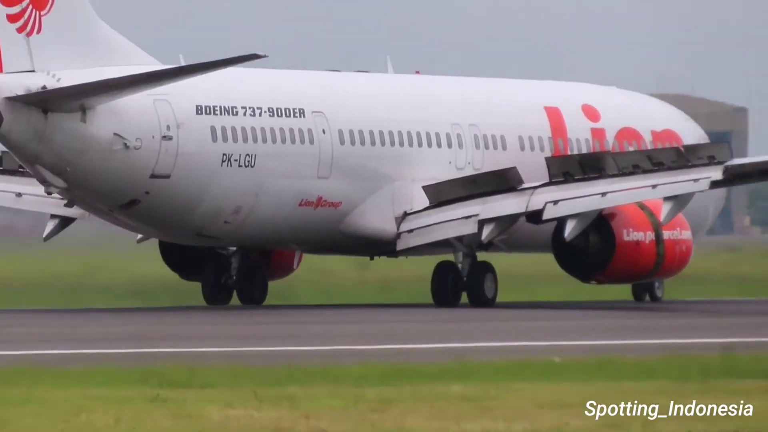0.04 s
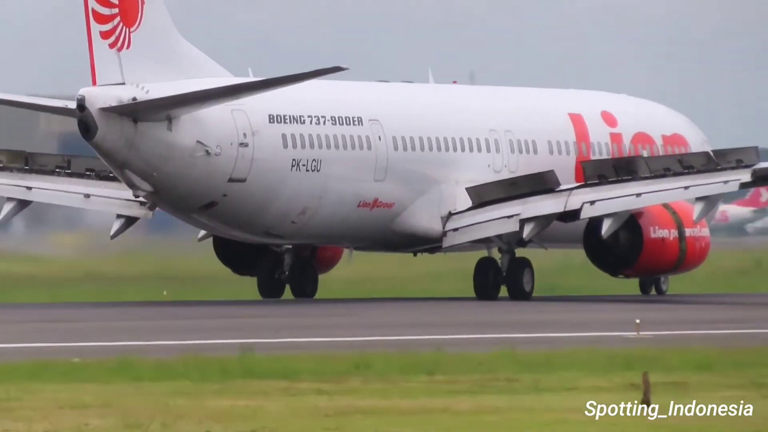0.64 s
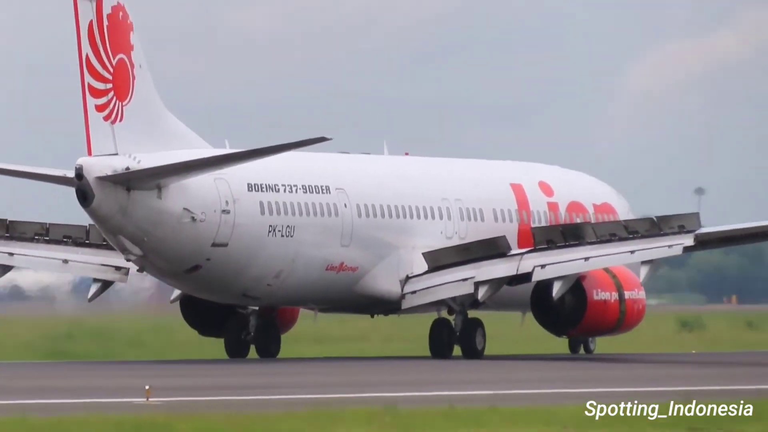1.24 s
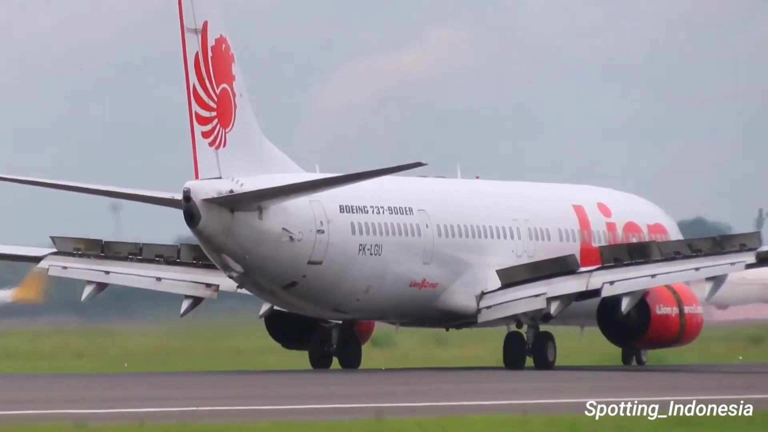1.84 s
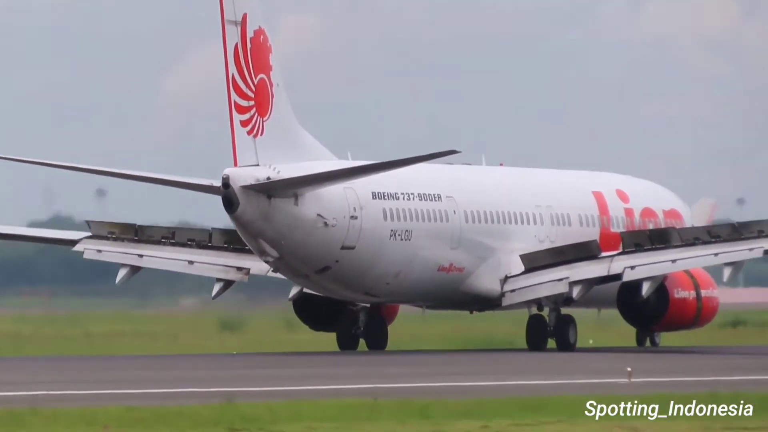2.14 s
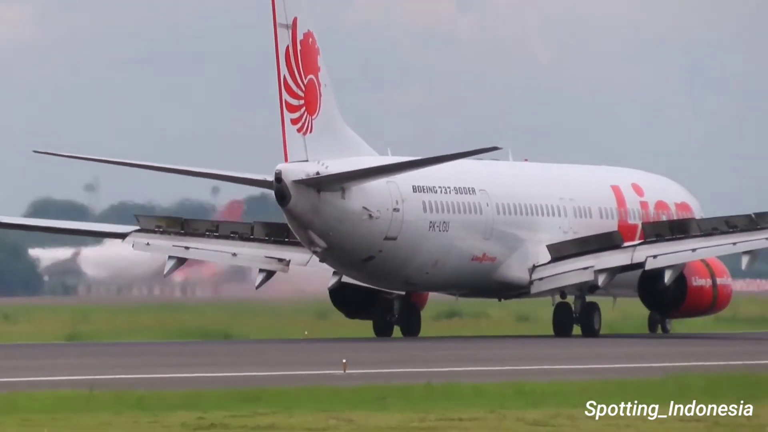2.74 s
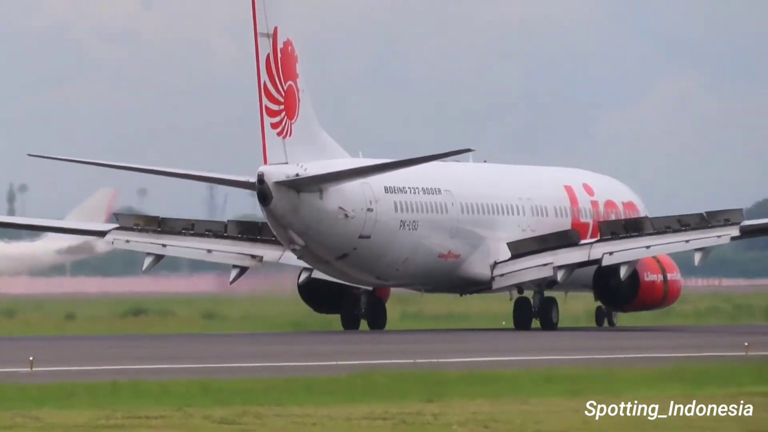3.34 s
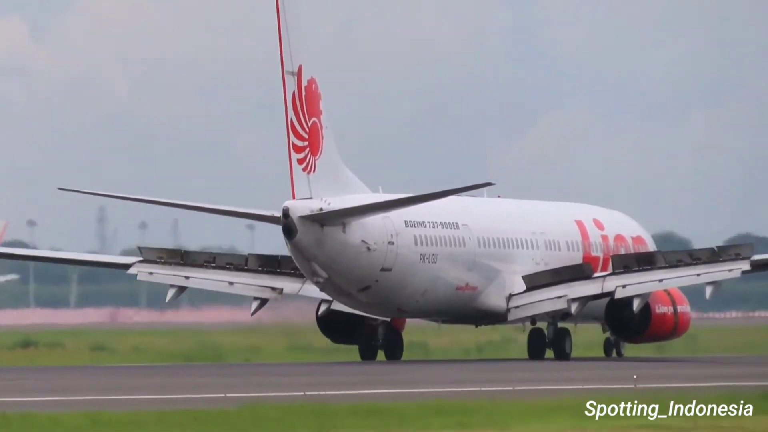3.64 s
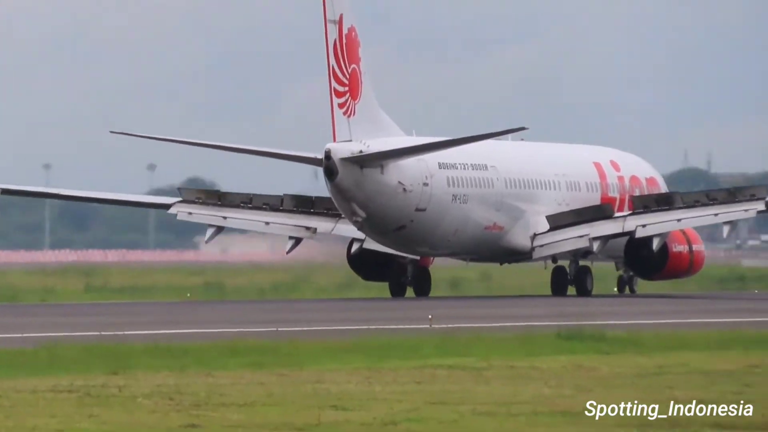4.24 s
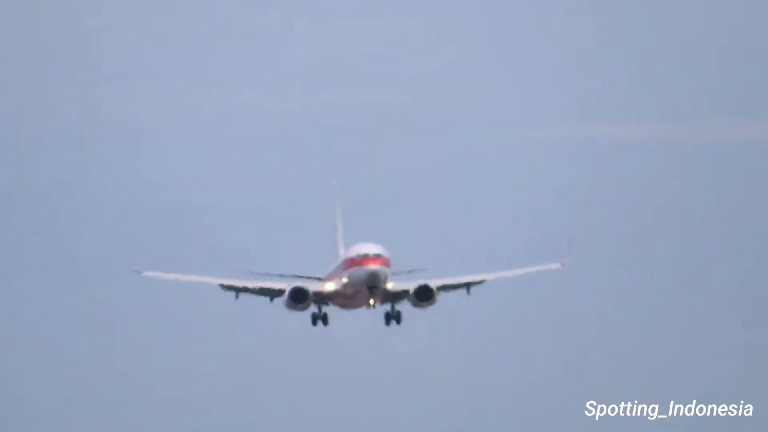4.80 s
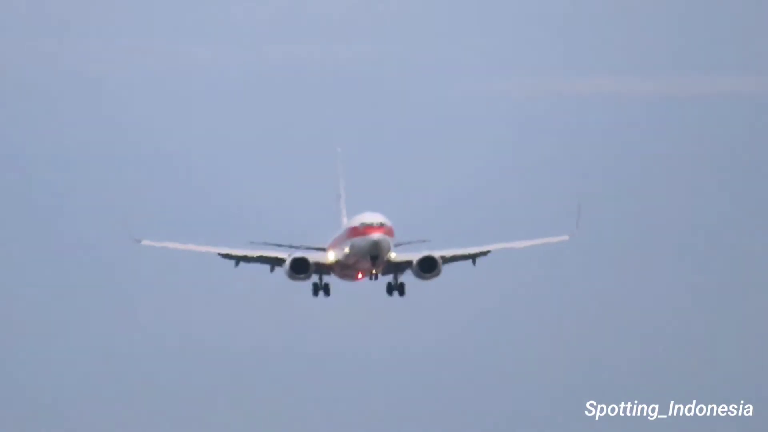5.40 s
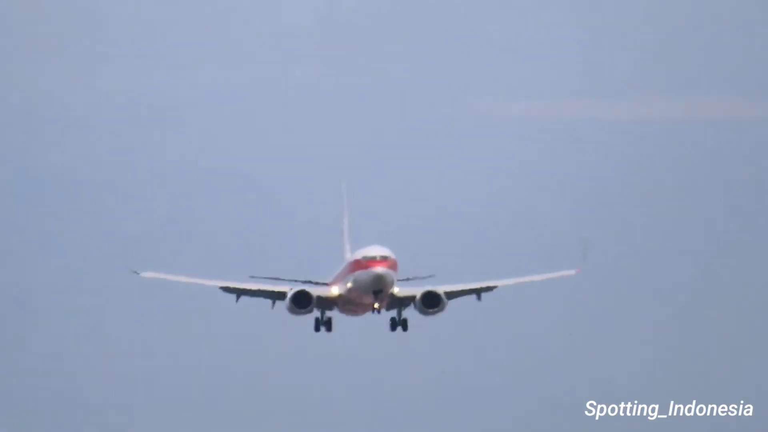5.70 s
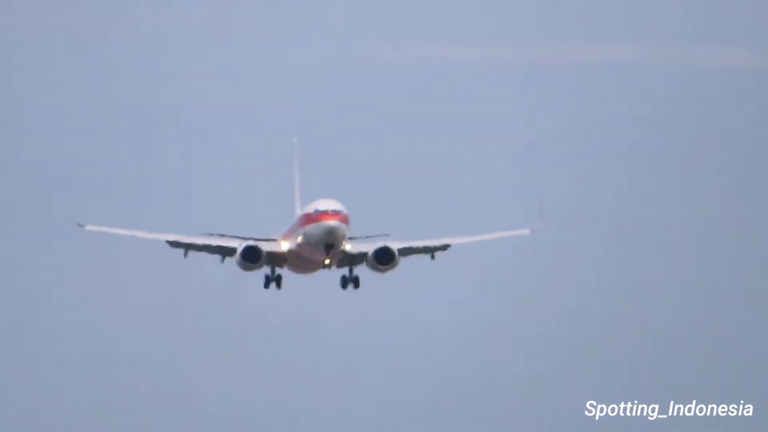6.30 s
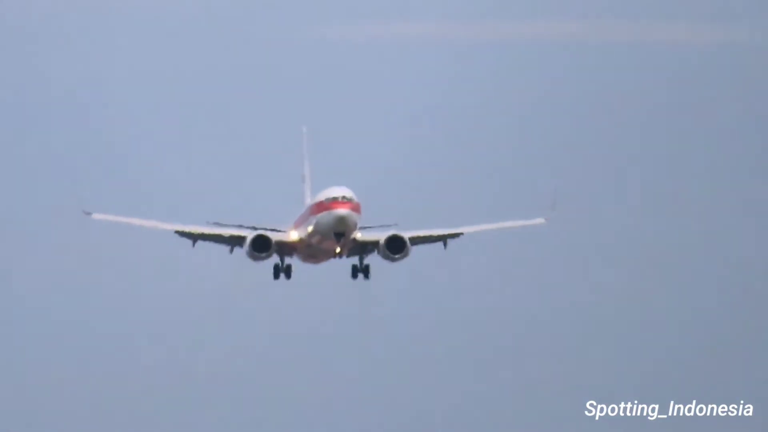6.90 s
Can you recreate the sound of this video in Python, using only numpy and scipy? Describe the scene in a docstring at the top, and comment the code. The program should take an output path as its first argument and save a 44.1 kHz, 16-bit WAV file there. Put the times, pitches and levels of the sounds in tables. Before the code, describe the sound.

A bass-heavy jet roar flutters in the air as an airliner slows on a runway some way off, its whine sinking into the rumble. After a very short silent break, another airliner is heard coming in, with low throbbing tones, sagging whines and hollow howls; it eases briefly, then gets louder. An airy breeze hiss builds near the microphone, with a few soft gusts.

```python
"""A jet roar over a wavering rumble: beside a runway an airliner rolls out, and after a short silent cut
a second one approaches. Exhaust eddies make each jet's rumble, roar and tearing edge, which flutter in
the turbulent air and are rippled by echoes. Whining bands in the roar sag and fade, hollow howls and low
booms swell, and a drone throbs under the second jet. Close by, a breeze hisses and buffets."""
import sys
import numpy as np
from scipy import signal
from scipy.fft import rfft, irfft
from scipy.io import wavfile
from scipy.ndimage import uniform_filter1d

SR = 44100
rng = np.random.default_rng(int(sys.argv[2]) if len(sys.argv) > 2 else 0)


def unload_audio(sound):
    """Save the sound as a 16-bit wav file, at the path given as the first command line argument."""
    columns = np.transpose(np.atleast_2d(sound))
    # keep every value between -1 and 1, then stretch to whole-number steps
    steps = np.round(np.clip(columns, -1, 1) * 32767)
    wavfile.write(sys.argv[1], SR, steps.astype(np.int16))


N = 315315
TIME = np.arange(N) / SR
FREQ = np.maximum(np.arange(N // 2 + 1) * SR / N, 1)
CUT_START_S, CUT_END_S = 4.737, 4.891


def undb(db):
    """Decibels to gain."""
    return 10 ** (np.asarray(db) / 20)


def curve(points):
    """A fader ride through (time [s], level [dB]) points, in dB at every sample."""
    return np.interp(TIME, *np.transpose(points))


def swells(table):
    """Summed gain of bell-shaped swells from (time [s], half length [s], level [dB]) rows."""
    return sum(undb(db) * np.exp(-((TIME - s) / half_s) ** 2) for s, half_s, db in table)


def colour(points):
    """An EQ curve through (frequency [Hz], level [dB]) points, as gain at every frequency."""
    hz, db = np.transpose(points)
    return undb(np.interp(np.log(FREQ), np.log(hz), db))


def unit(x):
    """Scale to rms 1."""
    return x / np.sqrt(np.mean(x ** 2))


def walk(rate):
    """A wobble that slides to a new random value every 1 / rate seconds; spread near 1."""
    steps = rng.standard_normal(2048)
    return 1.22 * np.interp(TIME * rate, np.arange(len(steps)), steps)


def noise(gain):
    """Noise of rms 1, shaped by a gain at every frequency."""
    return unit(irfft(rfft(rng.standard_normal(N)) * gain, N))


def narrow(hz, width_hz):
    """A narrow band of noise around a pitch that may glide."""
    slow_hz = FREQ[:N // 16]
    spectrum = rng.standard_normal(2 * len(slow_hz)).view(complex) / (1 + (2 * slow_hz / width_hz) ** 2)
    carrier = np.cos(2 * np.pi * np.cumsum(hz * np.ones(N)) / SR)
    return np.sqrt(2) * unit(irfft(spectrum, N)) * carrier


def stereo(mid, side):
    """Left and right from mid and side."""
    return np.array([mid + side, mid - side])


def part_levels(parts, swell, start_s):
    """Level in dB of each part of a jet: a steady drift plus its share of the common swell."""
    return [db + drift * (TIME - start_s) + share * curve(swell) for db, drift, share in parts]


def exhaust(spectrum, levels_db, surge_db, flutter_db, flutter_rate, patchy_db, rasp_db):
    """Jet mixing noise: big eddies rumble, middling ones roar, small ones at the nozzle tear and sizzle."""
    limits_hz = [18, 280, 1400, 3200, 12000]
    shape, out = colour(spectrum), 0
    # moving air focuses and scatters the sound; steep wave fronts come in quick, rasping bunches
    flutter = flutter_db * walk(flutter_rate) + rasp_db * walk(140)
    wobbles_db = [surge_db * walk(24), flutter, flutter, flutter]
    for lo, hi, db, wobble_db in zip(limits_hz, limits_hz[1:], levels_db, wobbles_db):
        eddies = rfft(rng.standard_normal(N)) * shape
        edges = np.geomspace(lo, hi, 4)
        # each band also fades by itself along its own paths
        bands = sum(irfft(eddies * (FREQ >= a) * (FREQ < b), N) * undb(patchy_db * walk(13))
                    for a, b in zip(edges, edges[1:]))
        out = out + unit(bands * undb(wobble_db)) * undb(db)
    return out


def reflect(x, share, drift=0.0002007, count=12):
    """Weak echoes off the ground and things nearby, their delays shifting as the source moves."""
    treble = irfft(rfft(x) * FREQ / np.hypot(FREQ, 600), N)  # small things return only short waves
    delays_s = [0.001511 + .035 * late + drift * (2 * speed - 1) * TIME
                for late, speed in rng.random((count, 2))]
    echoes = sum(np.interp(TIME - delay, TIME, treble) for delay in delays_s) / np.sqrt(count)
    return (x + share * echoes) / np.sqrt(1 + share ** 2)


def ripple(x, table):
    """Standing peaks and hollows that near echoes press into the roar."""
    gain_db = sum(db * .5 ** ((2 * (FREQ - hz) / width_hz) ** 2) for hz, width_hz, db in table)
    return irfft(rfft(x) * undb(gain_db), N)


def whines(table, start_s, sag_per_s, fade_db_per_s, wander=.012, flutter_db=0.8):
    """Whining bands that waver and sag in pitch together, flutter and sink into the roar."""
    age = np.maximum(TIME - start_s, 0)
    pitch = 1 - sag_per_s * age + wander * walk(5)
    bands = sum(undb(db + flutter_db * walk(7)) * narrow(hz * pitch, width_hz)
                for hz, width_hz, db in table)
    return bands * undb(-fade_db_per_s * age)


# bass-heavy tone of the first jet: (frequency [Hz], relative level [dB])
ROLLOUT_COLOUR = [(15, -39.5), (32, -8), (80, 2.5), (115, -2), (165, -1.5), (215, -6.5), (290, -16),
                  (650, -16), (1000, -17.5), (1800, -19), (3000, -28), (5000, -40.5), (7500, -57.5),
                  (9500, -65.5), (12000, -74)]
# its rumble, roar, tearing edge and sizzle: (base level [dB], drift [dB/s], share of the swell [ratio])
ROLLOUT_PARTS = [(-21, 0.3, 0.034), (-27.5, 0.03, 0.45), (-30.5, -0.52, 0.71), (-40, -0.4, 0.34)]
# the air carries it better or worse: (time [s], swell [dB])
ROLLOUT_SWELL = [(.3, 0.5), (.52, 5.5), (1.15, 2.5), (1.5, -0.5), (2.1, 1.9), (3.2, 2.1), (3.75, -0.7),
                 (4.7, 1.5)]
# the low rumble wavers unevenly, with one brief dip midway: (time [s], boost [dB])
RUMBLE_WAVER = [(0, 1.5), (.3, -0.2), (.75, -1), (1.45, 0.8), (2.1, 0), (2.45, -4), (2.9, 0.2), (3.35, 0.5),
                (3.55, 1.3), (3.98, -.5), (4.1, 2.5), (4.7, -1)]
# small lifts in the sizzle: (time [s], boost [dB])
SIZZLE_LIFT = [(0, 0.5), (.55, 1.2), (.9, 0), (1.4, 0), (2.0, 0.8), (3.1, 0), (4.7, 0.5)]
# bright, whining bands in the roar that slowly fade: (start pitch [Hz], width [Hz], start level [dB])
ROLLOUT_WHINES = [(2330, 260, -37.5), (2927, 500, -37), (4730, 1600, -48.5), (7020, 1600, -58.5)]
# near echoes lift some bands and thin others: (centre [Hz], width [Hz], boost [dB])
ROLLOUT_RIPPLE = [(674, 120, 0), (890, 45, 1.5), (966, 90, -2.5), (1457, 100, -1.5), (1563, 100, 1),
                  (2160, 110, -0.5), (2300, 110, 0.5), (2630, 160, -2), (2860, 130, 1), (3330, 140, -2),
                  (3420, 150, 1), (3620, 110, 0.5), (3840, 110, -1.5), (3970, 90, 2.5), (4070, 220, -2),
                  (4620, 250, 0.5), (5110, 280, -2.2), (5530, 250, 1.5), (6400, 400, 0), (6750, 350, 0.5)]


def rollout(hollow):
    """The first jet slows down: the rumble wavers, whining bands in the roar fade and the edge dulls."""
    rumble_db, roar_db, edge_db, sizzle_db = part_levels(ROLLOUT_PARTS, ROLLOUT_SWELL, start_s=0)
    levels_db = [rumble_db + curve(RUMBLE_WAVER), roar_db, edge_db, sizzle_db + curve(SIZZLE_LIFT)]
    roar = exhaust(ROLLOUT_COLOUR, levels_db, surge_db=0.7, flutter_db=0.54, flutter_rate=20,
                   patchy_db=0.18, rasp_db=0.66)
    low_throbs = throbs()
    whine = whines(ROLLOUT_WHINES, start_s=0, sag_per_s=.012, fade_db_per_s=4.5)
    throbs_and_tones = low_throbs + whine * undb(curve(ROLLOUT_SWELL)) + turbine_whistle()
    return ripple(reflect(roar, share=0.32) + throbs_and_tones + hollow, ROLLOUT_RIPPLE)


# brief low throbs in the rumble: (time [s], half length [s], level [dB])
THROBS = [(.02, 0.041, -22), (1.65, .06, -27.5), (2.13, .09, -25), (2.71, 0.045, -19)]


def throbs():
    """A narrow bass band pushes briefly out of the rumble."""
    return narrow(hz=81.4, width_hz=16) * swells(THROBS)


# howls at their crests: (time [s], length [s], pitch [Hz], glide [Hz/s], width [Hz], level [dB])
HOWLS = [(0.18, .4, 390, -29, 45, -31), (1.1, 1., 205, 0, 34, -33), (.9, 1., 1710, -150, 380, -37.5),
         (0.46, .4, 2940, -300, 420, -40), (2.75, 1.6, 2290, -40.5, 170, -45), (2.5, 1.1, 425, 25, 70, -34),
         (2.77, 2.2, 250, 0, 80, -32.5), (2.25, 3.2, 620, 0.5, 51, -38),
         (2.105, 1.4, 2950, -59.5, 180, -47), (2.85, 2., 3496, -130, 220, -47.5),
         (3.3, 2., 1900, -70.5, 520, -38), (3.598, 2.2, 4600, -170, 330, -61), (4.2, 0.61, 112, 0, 45, -26),
         (3.995, 0.93, 317.2, 36, 38, -35), (4.55, 0.64, 850, 0, 200, -33.5),
         (4.795, 0.7, 1110, 81, 250, -31.5), (4.92, 0.33, 1300, -1.5, 660, -31),
         (5.0, 0.5, 506, 0.5, 60, -29), (5.12, .6, 1655, -200, 110, -34.5), (5.3, .5, 2700, -100, 350, -38),
         (5.3, 0.99, 238, 0, 58, -21), (5.39, 0.78, 2680, 2, 1300, -36), (5.95, 1.3, 1428, -40, 90, -40.5),
         (6.1, .45, 757, 57, 90, -27.5), (6.38, .8, 338.5, -75, 85, -23.5), (6.24, 0.7, 950, -40, 100, -33),
         (6.41, .45, 630.5, -29.5, 110, -25.5), (6.544, .6, 1815, -650, 200, -31),
         (6.87, .45, 424.8, -12.5, 85, -25.5), (7.05, .6, 2180, -50.5, 150, -31.5),
         (7.01, 0.87, 2515, -45.5, 200, -34.5), (7.127, .45, 1128, -50, 220, -27.5)]


def howls():
    """Hollow bands that rise out of the roar and sink back as the jets move."""
    out = 0
    for crest_s, length_s, hz, glide, width_hz, db in HOWLS:
        offset_s = np.clip(TIME - crest_s, -length_s / 2, length_s / 2)
        arch = np.cos(np.pi * offset_s / length_s)
        out = out + undb(db) * arch * narrow(hz + glide * offset_s, width_hz)
    return out


# slow bass builds: (centre [Hz], width [Hz], end time [s], end level [dB], rise [dB/s])
BOOMS = [(149.4, 80, 4.8, -15, 16), (101.6, 33, 14, -27, 1), (52.5, 21, 7.6, -21.5, 6.5)]


def booms():
    """Deep, narrow swells: one builds late in the rollout, the others as the second jet nears."""
    return sum(narrow(hz, width_hz) * undb(db - rise * np.abs(end_s - TIME)) * (TIME < end_s)
               for hz, width_hz, end_s, db, rise in BOOMS)


def flicker(x, depth_db, rate):
    """Each stretch of the treble flickers by itself."""
    edges_hz = [0, 4500, 6500, 9000, 12000, SR]
    spectrum = rfft(x)
    return sum(irfft(spectrum * (FREQ >= a) * (FREQ < b), N) * undb(depth_db * walk(rate))
               for a, b in zip(edges_hz, edges_hz[1:]))


# bright, airy tone of the hiss: (frequency [Hz], relative level [dB])
HISS_COLOUR = [(800, -25.5), (3000, 2.5), (5500, 13), (7500, 7.5), (9500, 3.5), (12500, 1.5), (15500, -4)]
# the hiss creeps up, eases and rises again: (time [s], level [dB])
HISS_LEVEL = [(0, -58), (1.6, -57.5), (2.05, -53.5), (3.56, -52), (3.62, -49.5), (4.7, -43.5), (4.9, -47),
              (5.2, -49), (5.85, -49.5), (6.5, -39), (7.15, -37.5)]
# short rustles on top: (time [s], half length [s], level [dB])
RUSTLES = [(3.0, 0.016, -46), (3.64, 0.038, -55), (4.1, 0.056, -56)]
# stereo spread of the hiss: (frequency [Hz], side minus mid [dB])
HISS_WIDTH = [(3000, -4), (6000, -10), (9000, -4.5), (12000, 1)]


def breeze_hiss():
    """The breeze close by: a wide, flickering hiss with short rustles."""
    gain = undb(curve(HISS_LEVEL) + .5 * walk(29)) + swells(RUSTLES)
    mid, side = (reflect(noise(colour(HISS_COLOUR)), share=0.35) for _ in range(2))
    side = irfft(rfft(side) * colour(HISS_WIDTH), N)
    return gain * flicker(stereo(mid, side), depth_db=1.4, rate=16)


# the whistle peeks through late in the rollout: (time [s], level [dB])
WHISTLE_LEVEL = [(3.6, -82), (3.9, -61), (4.1, -55), (4.25, -71), (4.7, -65)]


def turbine_whistle():
    """A faint, thin whistle from the first jet's turbine."""
    return narrow(hz=6560, width_hz=70) * undb(curve(WHISTLE_LEVEL))


# dull tone of wind on the microphone: (frequency [Hz], relative level [dB])
BUFFET_COLOUR = [(20, 2), (55, -6), (130, 12), (300, -4), (450, -11), (700, -46), (2000, -63)]
# gusts: (time [s], half length [s], level [dB])
GUSTS = [(4.6, .5, -55), (5.15, 0.11, -39), (5.7, 0.96, -45.5), (6.55, 0.12, -35), (6.92, 0.16, -40)]


def wind_buffet(steady_db=-79):
    """Gusts over a light breeze buffet the microphone, pushing its two ports opposite ways."""
    buffet = noise(colour(BUFFET_COLOUR)) * (undb(steady_db) + swells(GUSTS))
    return stereo(0, buffet * undb(3.9 * walk(14)))


# brighter tone of the second jet: (frequency [Hz], relative level [dB])
APPROACH_COLOUR = [(15, -32), (45, -12), (65, -10), (82, -5.5), (103, -4.5), (126, -8), (160, -4),
                   (200, -9.5), (260, -11.5), (330, -10), (510, -16), (850, -16), (1170, -22.5),
                   (1500, -18.5), (2050, -21), (2650, -23), (2850, -25.5), (5200, -38), (6300, -47),
                   (8000, -50), (12000, -63)]
# its rumble, roar, tearing edge and sizzle: (base level [dB], drift [dB/s], share of the swell [ratio])
APPROACH_PARTS = [(-18.5, 0.1, 0.6), (-20.5, 0.04, 0.64), (-26.5, 0, 0.87), (-32, -1.5, 0.78)]
# it fades, then grows as it nears: (time [s], swell [dB])
APPROACH_SWELL = [(4.9, -1), (5.1, -2.5), (5.35, -4.5), (5.62, -6.5), (6.1, -2.5), (6.55, -0.2),
                  (7.15, 1.5)]
# whining bands in its roar: (start pitch [Hz], width [Hz], start level [dB])
APPROACH_WHINES = [(847, 320, -31.5), (1492, 61, -35.5), (1720, 92, -38.5), (2480, 170, -37.5),
                   (3000, 200, -38.5)]
# peaks and hollows from near echoes: (centre [Hz], width [Hz], boost [dB])
APPROACH_RIPPLE = [(646, 40, -2), (970, 53, 1), (1426, 90, 2.5), (1710, 130, 1.5), (2100, 190, -1.5),
                   (2430, 160, -0.8), (3060, 100, 0.8), (3140, 140, -1.5), (4650, 170, -2),
                   (4930, 170, 2.5), (5630, 260, 1.2), (6030, 200, -0.5), (6700, 220, -1.6),
                   (7370, 170, 4.5)]


def approach(hollow):
    """The second jet sinks toward the runway, its roar dipping and then growing as it nears."""
    levels_db = part_levels(APPROACH_PARTS, APPROACH_SWELL, start_s=CUT_END_S)
    roar = exhaust(APPROACH_COLOUR, levels_db, surge_db=1.5, flutter_db=0.18, flutter_rate=16,
                   patchy_db=1.1, rasp_db=0.5)
    roar = reflect(roar, share=0.41)
    whine = whines(APPROACH_WHINES, start_s=CUT_END_S, sag_per_s=.035, fade_db_per_s=8.0)
    return ripple(roar + whine + drone() + hollow, APPROACH_RIPPLE)


# low tones under the second jet: (pitch [Hz], crest time [s], half length [s], level [dB])
DRONE_LINES = [(48.8, 4.6, 1.8, -26), (50.7, 6.75, 0.47, -25.5), (74.6, 5.36, 0.82, -29.5),
               (94.2, 4.93, 0.23, -19.5), (103.1, 7, 1.8, -22.5), (113.8, 5.1, 1.1, -25),
               (143.4, 5.1, 1, -22.5), (136, 6.36, .6, -27.5), (155.4, 7.06, 1.2, -26),
               (187, 5.1, 1.04, -27), (218.6, 5.9, 0.78, -29.5), (236, 5.25, 1.17, -22.5),
               (265, 6.3, 1.8, -31), (286, 6.1, 0.8, -27.5), (351, 5.43, 1.4, -30), (412, 6.9, 0.21, -26.5),
               (434.5, 6.85, 0.33, -26.5)]


def drone(waver=0.00495, throb_db=1.46, jitter_rad=0.35):
    """Low engine tones that waver together; each swells, throbs and fades in its own time."""
    clock = np.cumsum(1 + waver * walk(5)) / SR
    out = 0
    for hz, *swell in DRONE_LINES:
        gain = swells([swell]) * undb(throb_db * walk(7))
        phase = 2 * np.pi * (hz * clock + rng.random()) + jitter_rad * walk(22)
        out = out + gain * np.sin(phase)
    return np.sqrt(2) * out


# stereo spread of the jets, widest in the treble: (frequency [Hz], side minus mid [dB])
JET_WIDTH = [(40, -49.5), (200, -35.5), (380, -22.5), (700, -40.5), (1300, -26), (2400, -23.5), (4400, -15),
             (9000, -9)]


def spread(jets):
    """The distant jets sit near the centre; scattered sound reaches the two ports in random phase."""
    phase_steps = rng.uniform(-.8, 0, 600)
    phase = 2 * np.pi * np.interp(FREQ, np.linspace(0, SR / 2, 600), np.cumsum(phase_steps))
    side = irfft(rfft(jets) * colour(JET_WIDTH) * np.exp(1j * phase), N)
    return stereo(jets, side)


def scene():
    """The rollout, a silent cut, then the approach, with howls, booms and breeze through both."""
    before_cut, after_cut = TIME < CUT_START_S, TIME > CUT_END_S
    hollow = howls() + booms()
    jets = np.where(after_cut, approach(hollow), rollout(hollow))
    gate = uniform_filter1d(1. * (before_cut | after_cut), size=24)
    return (spread(jets) + breeze_hiss() + wind_buffet()) * gate


def record(dry):
    """Thin the deepest bass, round the highest peaks and cut the top."""
    low_cut_hz, ceiling, top_hz = 24, .95, 15200
    lean = signal.sosfilt(signal.butter(1, low_cut_hz, "high", fs=SR, output="sos"), dry)
    rounded = lean / (1 + (lean / ceiling) ** 8) ** (1 / 8)
    return signal.sosfilt(signal.ellip(10, .2, 80, top_hz, fs=SR, output="sos"), rounded)


dry = scene()
out = record(dry)
unload_audio(out)
```